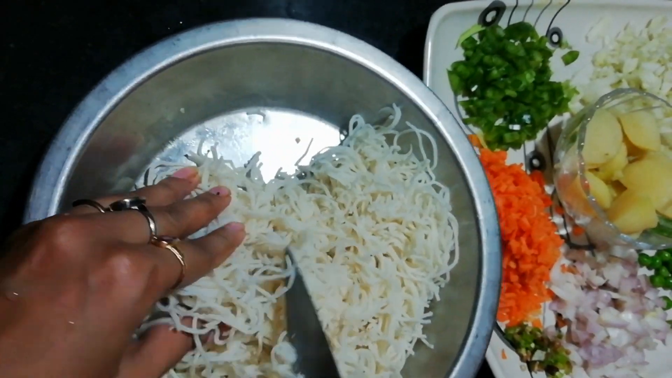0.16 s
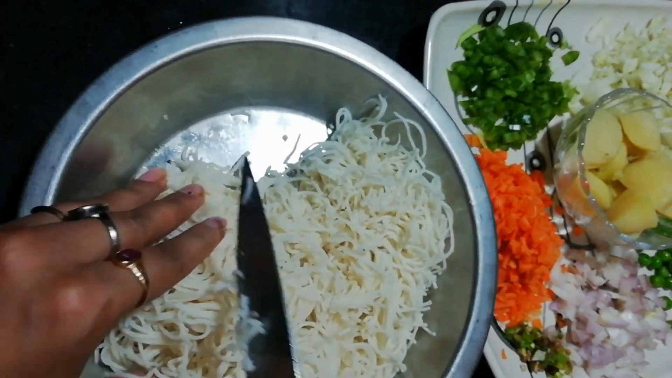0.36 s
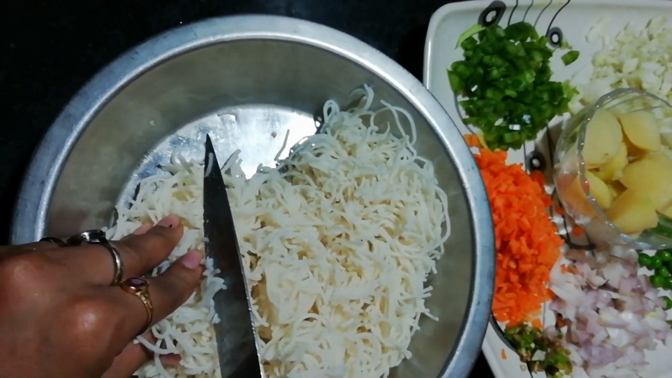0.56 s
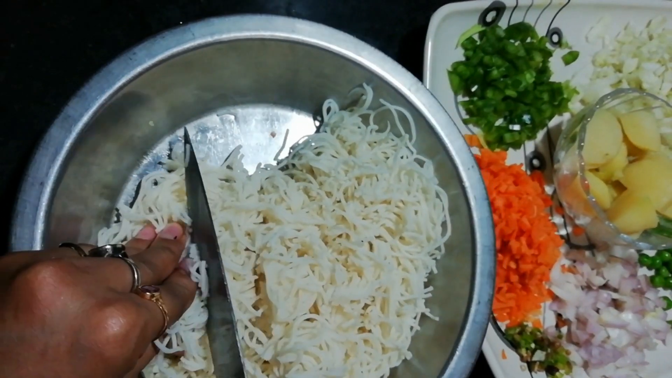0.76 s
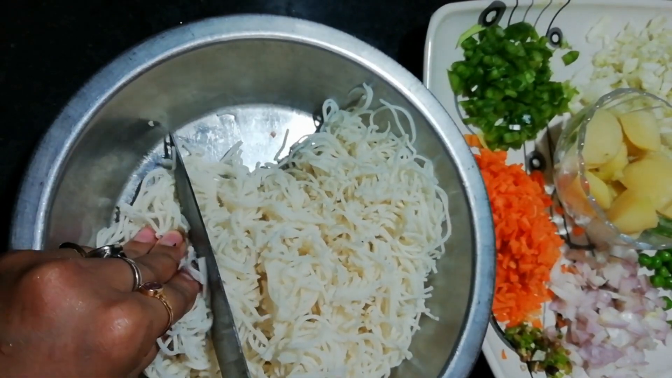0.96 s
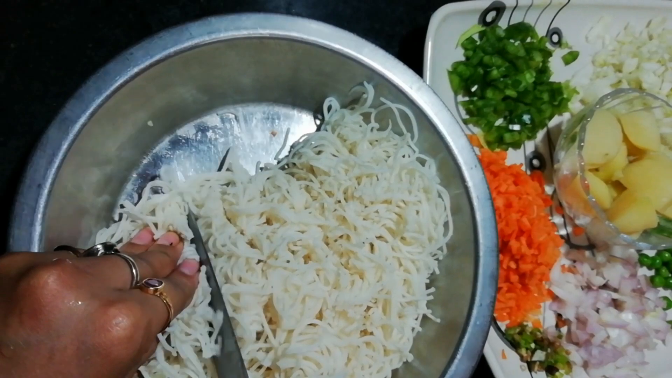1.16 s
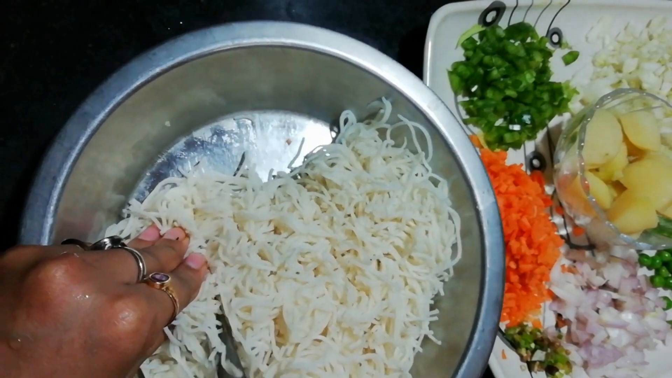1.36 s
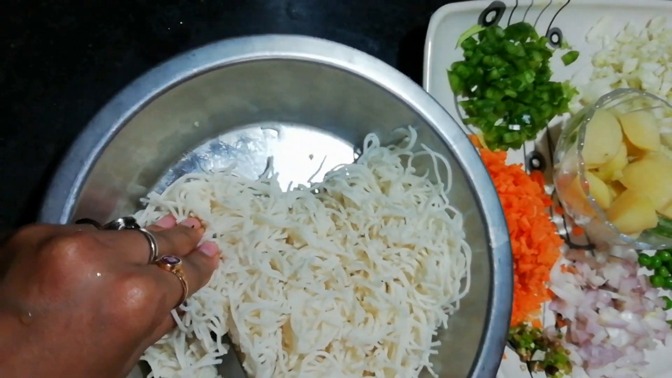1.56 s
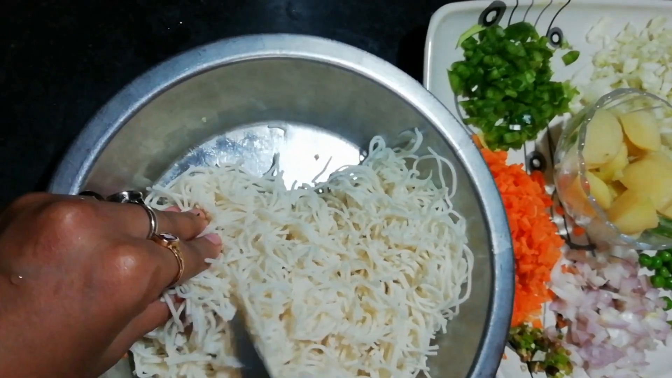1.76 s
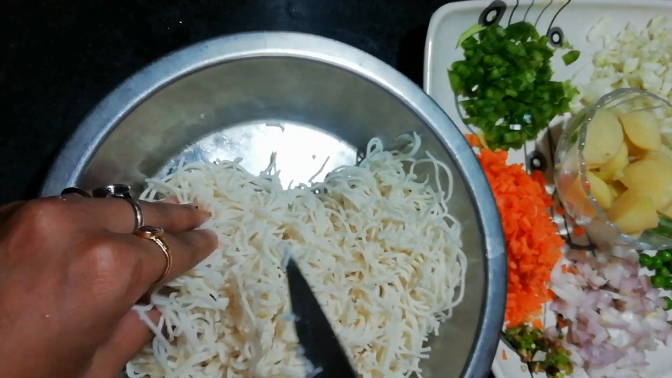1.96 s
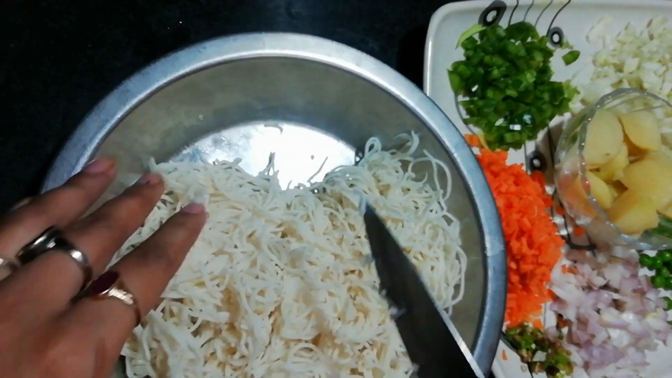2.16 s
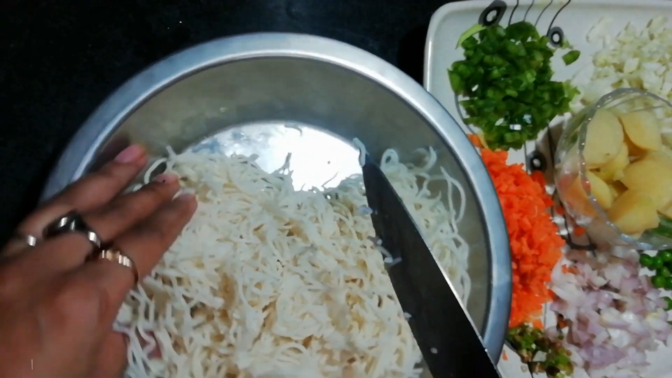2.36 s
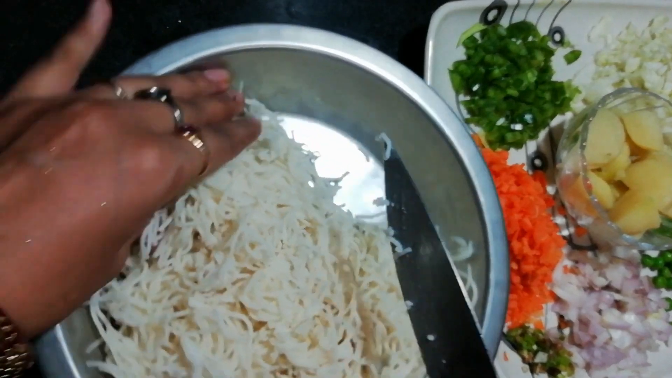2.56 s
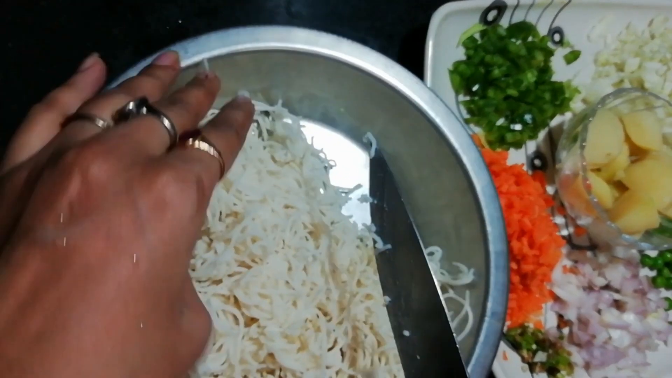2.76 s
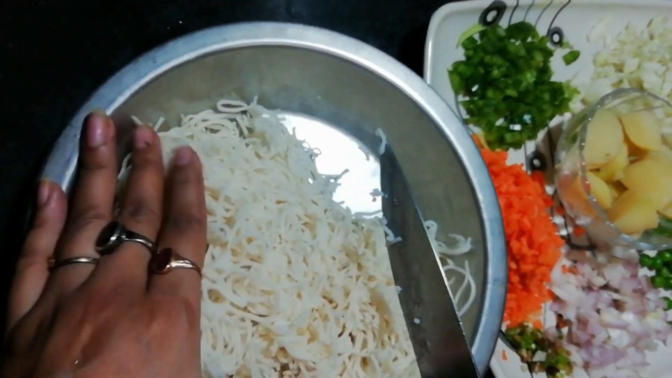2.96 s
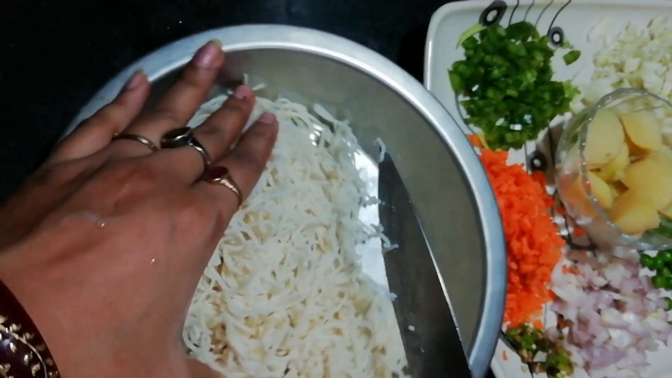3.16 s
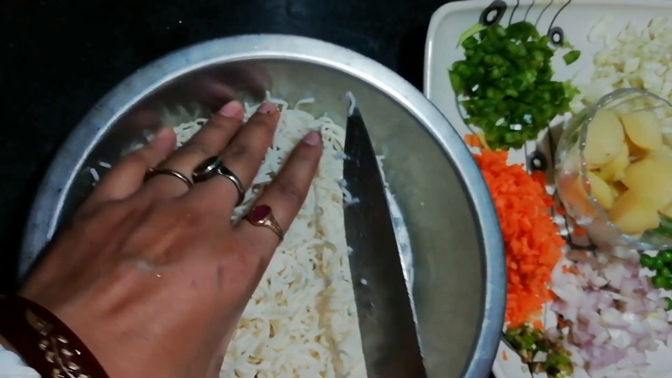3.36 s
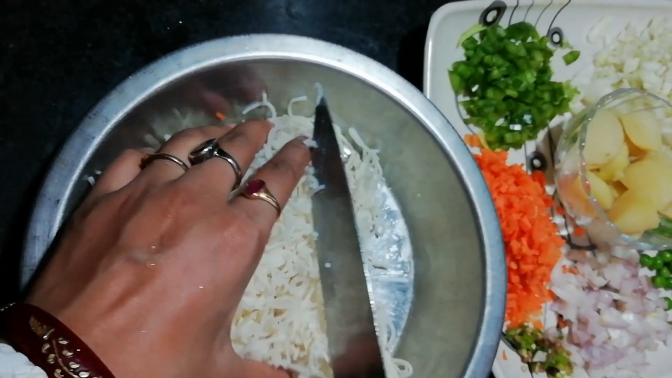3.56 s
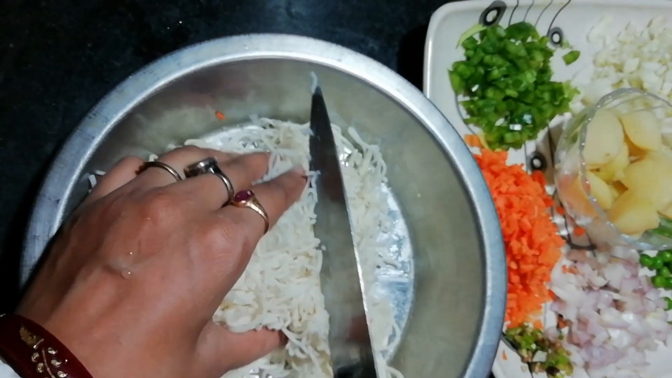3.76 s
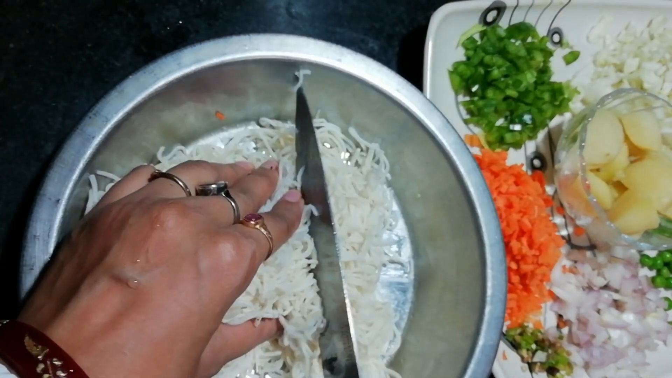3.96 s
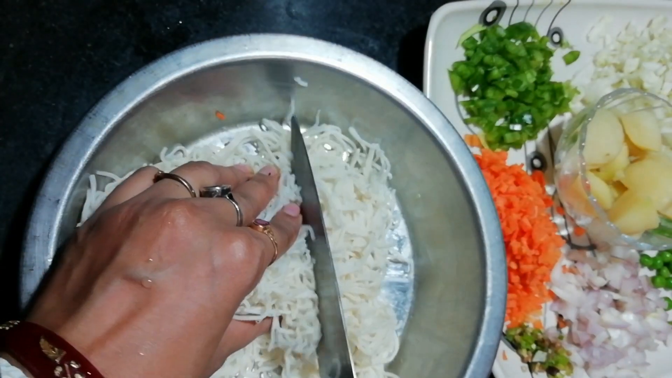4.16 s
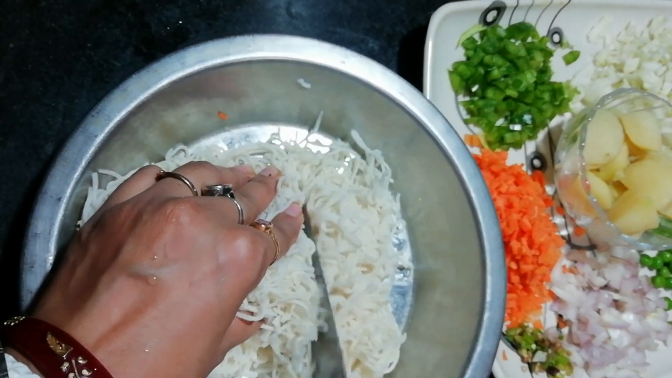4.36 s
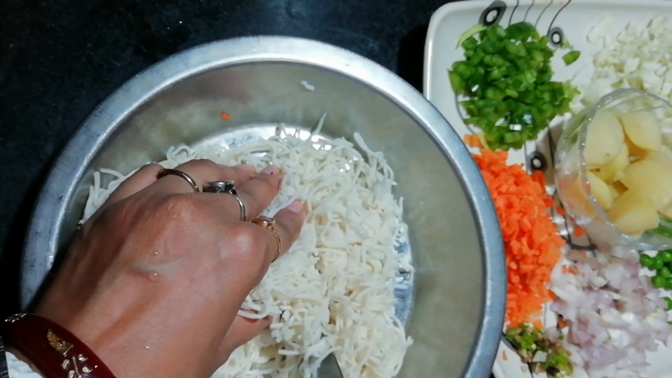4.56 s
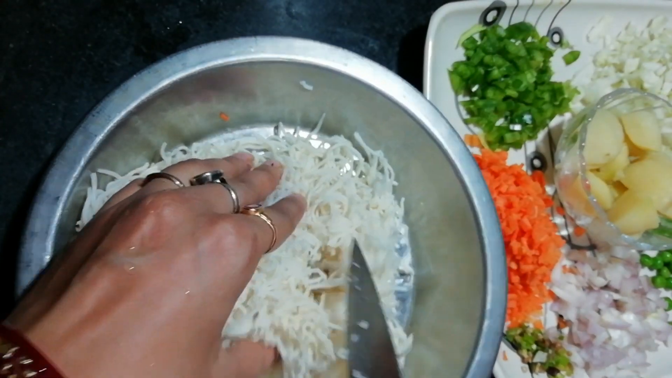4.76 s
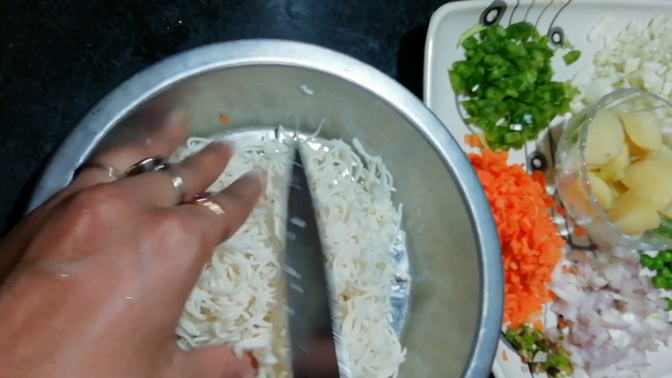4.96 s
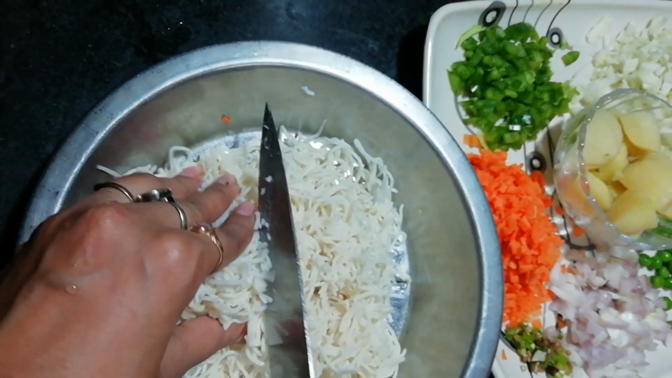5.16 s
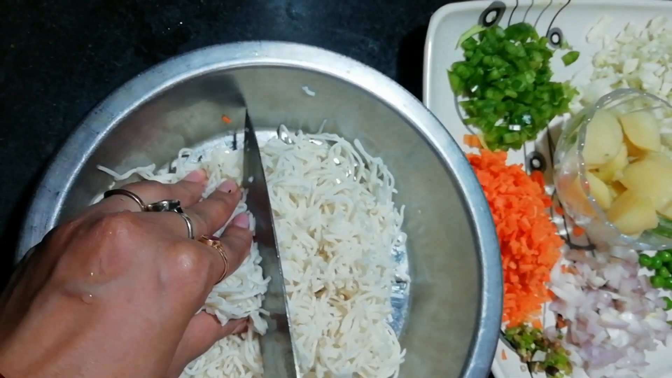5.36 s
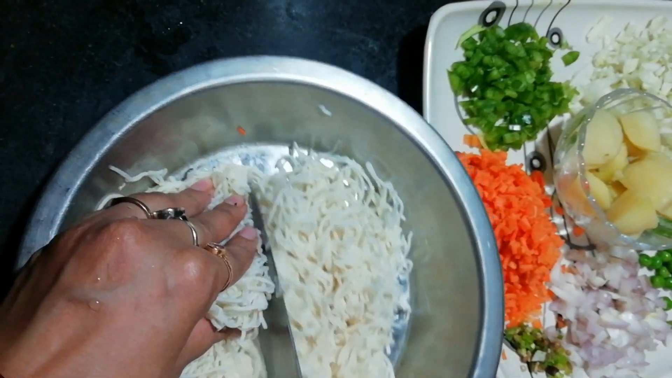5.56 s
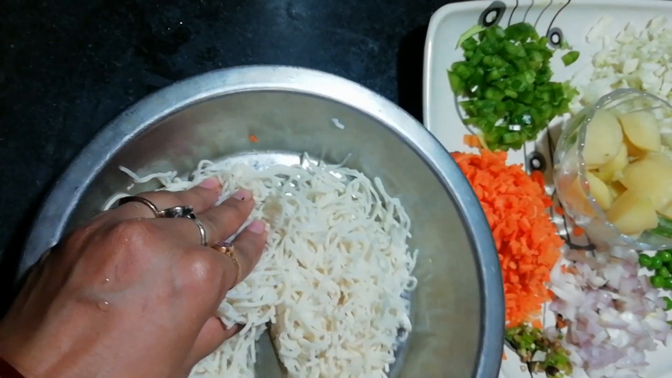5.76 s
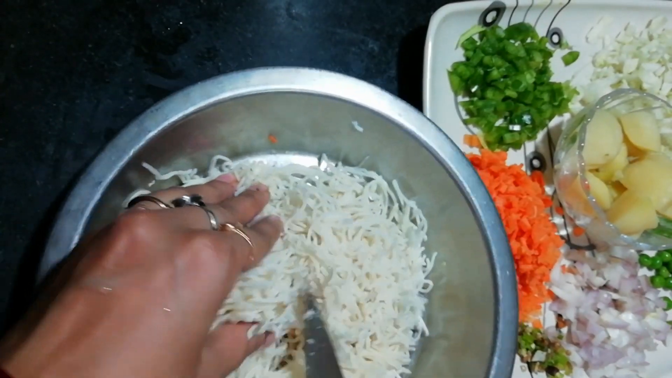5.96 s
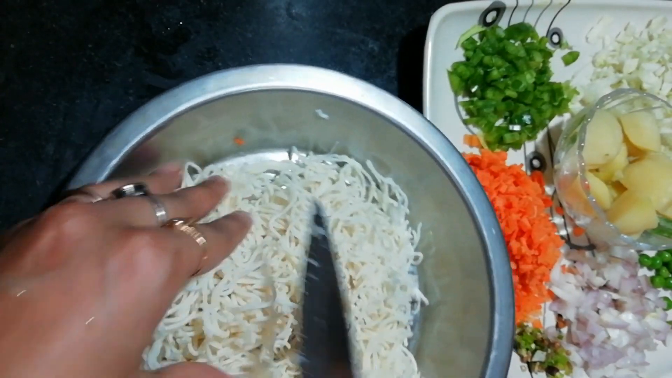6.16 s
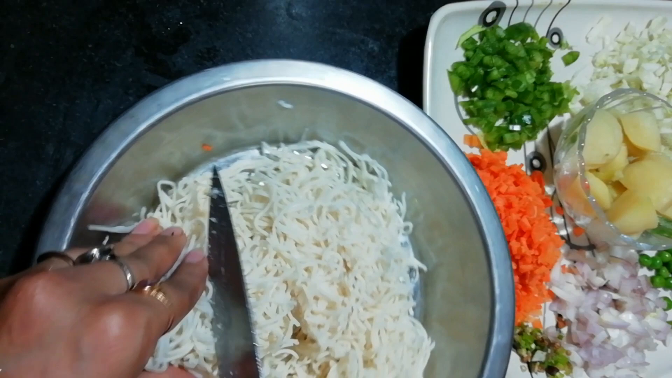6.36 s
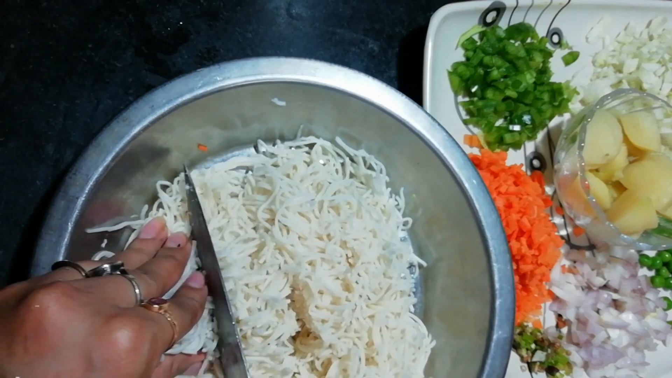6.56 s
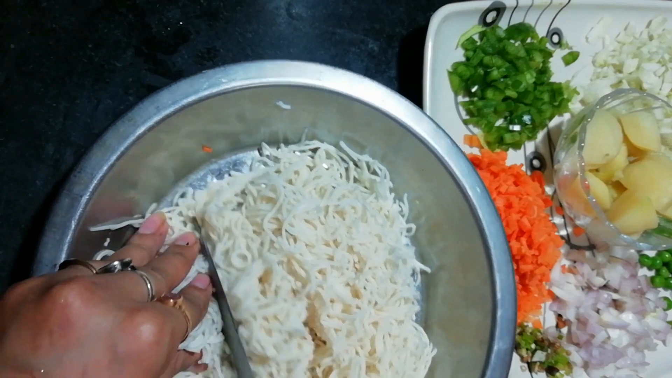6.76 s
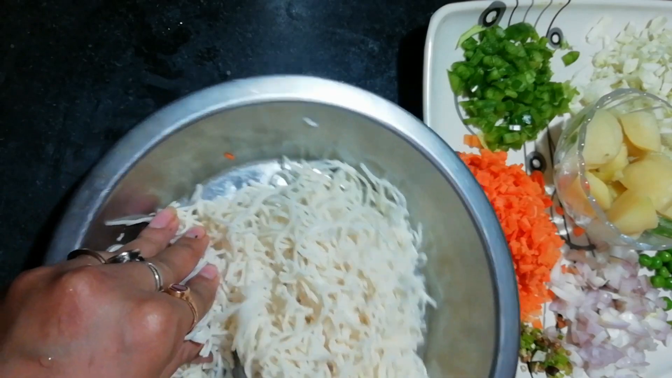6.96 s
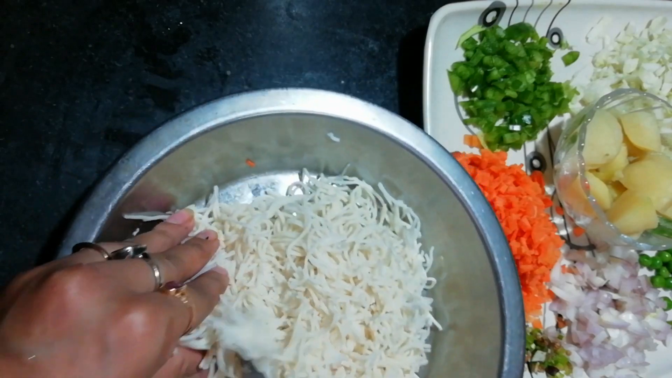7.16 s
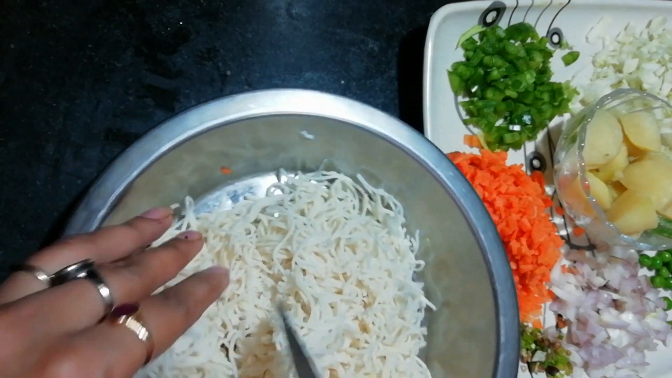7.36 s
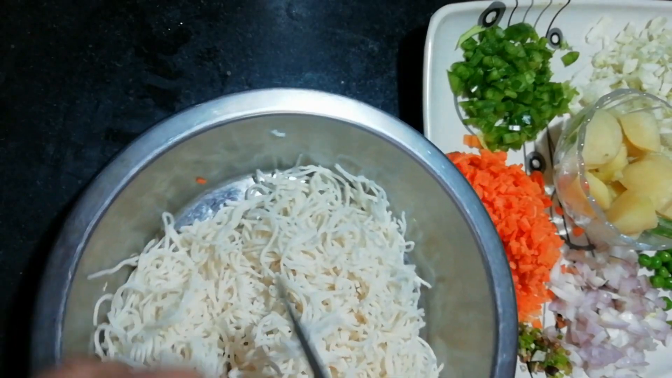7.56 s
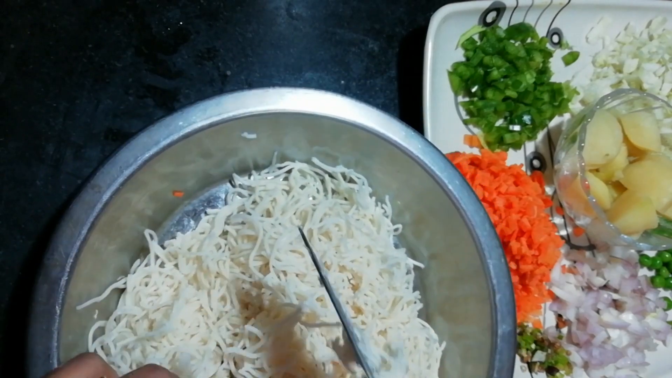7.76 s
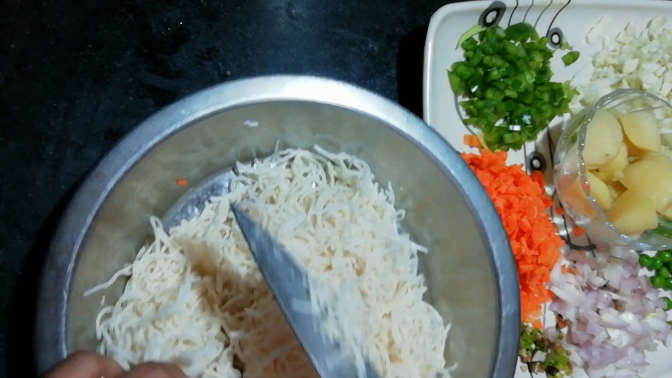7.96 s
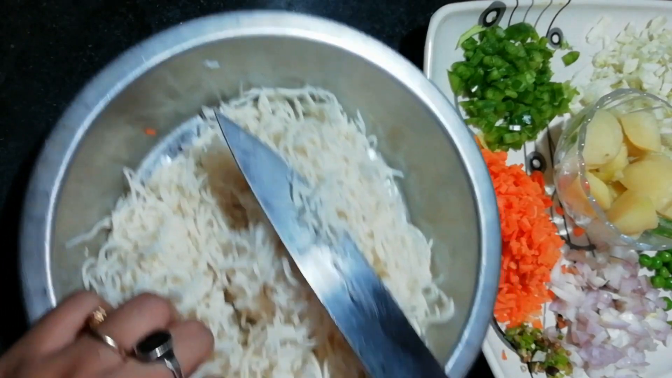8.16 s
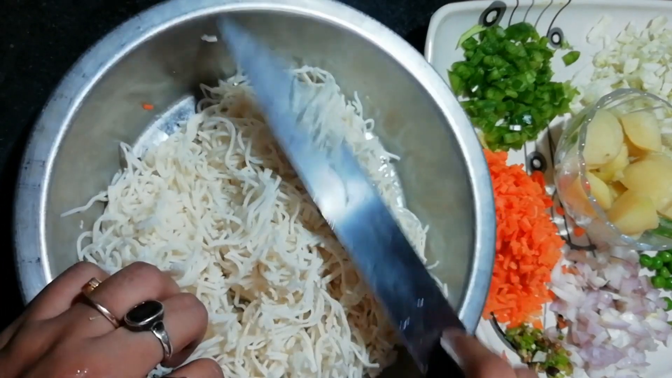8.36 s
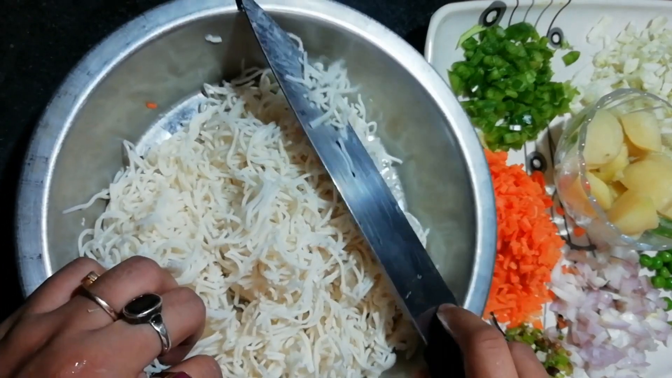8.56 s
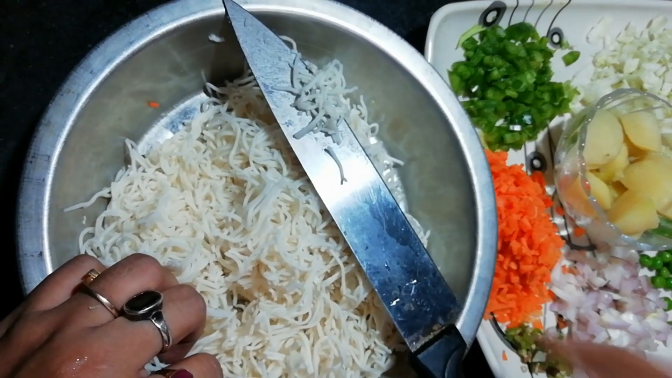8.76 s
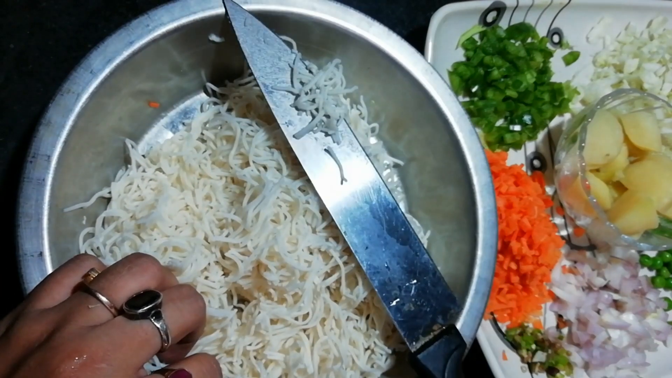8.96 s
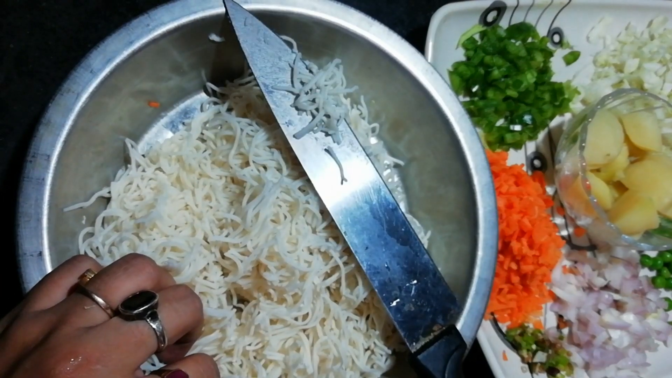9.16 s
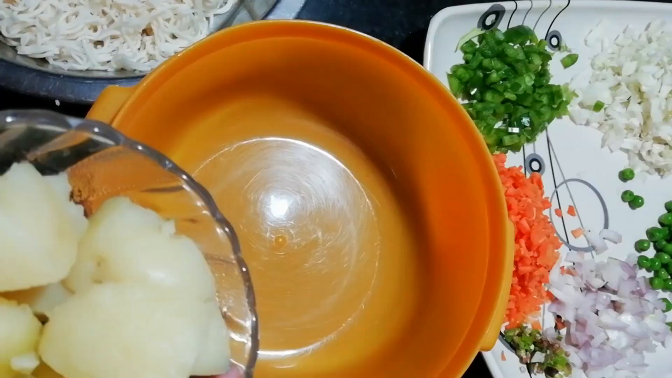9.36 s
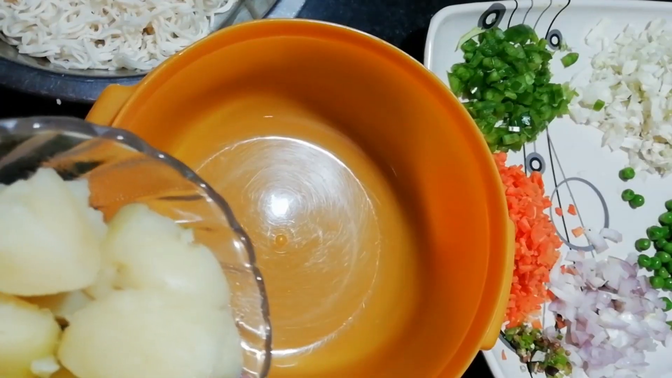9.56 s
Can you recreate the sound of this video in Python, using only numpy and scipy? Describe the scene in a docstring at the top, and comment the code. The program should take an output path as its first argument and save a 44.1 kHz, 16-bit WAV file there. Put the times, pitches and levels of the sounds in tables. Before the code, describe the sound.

Close, irregular metallic knocks and gritty blade drags through soft wet noodles in a metal bowl, with a small hard kitchen ringing briefly around them.

```python
"""A kitchen knife chops boiled noodles in a steel bowl, close to a phone in a small hard-walled kitchen.
The blade knocks excite decaying bowl modes, drags ring them with trains of slips, and the wet noodles
are filtered noise and clicks; at the end the blade is laid on the rim. Soft rubs and rumbles join in,
and the walls answer with a dense noise tail. Underneath lie a wavering low hum, a faint, thin whistle
of three partials and the coloured noise of the room's air."""
import sys
import numpy as np
from scipy import signal
from scipy.fft import rfft, irfft
from scipy.io import wavfile
from scipy.ndimage import uniform_filter1d

SR = 44100
rng = np.random.default_rng(int(sys.argv[2]) if len(sys.argv) > 2 else 0)


def materialize(psi):
    """Save the field psi as 16-bit PCM at rate SR to the path in sys.argv[1].

    A 1-D psi becomes a single channel; in a 2-D psi each row is a channel.
    """
    bounded = np.clip(np.atleast_2d(psi).T, -1, 1)
    quanta = np.round(bounded * 32767).astype(np.int16)
    wavfile.write(sys.argv[1], SR, quanta)


N = 423801
TIME = np.arange(N) / SR
PUSH_ATTACK_S, PUSH_RELEASE_S = 0.036, 0.041  # onset and release of pushes, rubs and shifts


def undb(db):
    """Decibels to gain."""
    return 10 ** (np.asarray(db) / 20)


def unit(x):
    """Scale to rms 1."""
    return x / np.sqrt(np.mean(x ** 2))


def fade(t, t60):
    """Exponential decay, 60 dB down after t60 seconds."""
    return np.exp(-np.log(1000) * t / t60)


def tint(x, points):
    """Causal minimum-phase filter that follows (Hz, dB) points, built from the cepstrum."""
    size = 8192
    hz, db = np.transpose(points)
    grid_hz = np.fft.rfftfreq(size, 1 / SR) + 1  # 1 Hz up, to keep the logarithm finite
    magnitude = undb(np.interp(np.log(grid_hz), np.log(hz), db))
    cepstrum = irfft(np.log(magnitude))
    # folding the cepstrum onto positive time makes the response causal
    cepstrum[1:size // 2] *= 2
    cepstrum[size // 2 + 1:] = 0
    response = irfft(np.exp(rfft(cepstrum)))[:size // 2]
    return signal.oaconvolve(np.atleast_2d(x), response[None], axes=-1)[:, :x.shape[-1]]


def band(x, lo_hz, hi_hz):
    """Butterworth band-pass."""
    edges_hz = [lo_hz, min(hi_hz, SR / 2 - 1000)]
    return signal.sosfilt(signal.butter(N=3, Wn=edges_hz, btype="band", fs=SR, output="sos"), x)


def registers(x):
    """Split into thud, body, zing and tick, from low to high."""
    edges_hz = (150, 1100, 3500, 9000, 16000)
    return [band(x, lo, hi) for lo, hi in zip(edges_hz, edges_hz[1:])]


def pair(size, alike):
    """Noise at the phone's two ports; alike is the shared part of its power."""
    shared = rng.standard_normal(size)
    separate = rng.standard_normal((2, size))
    return np.sqrt(alike) * shared + np.sqrt(1 - alike) * separate


def walk(rate):
    """Smoothed random wandering of rms 1, drawn anew about rate times a second."""
    hold = int(SR / rate)
    steps = np.repeat(rng.standard_normal(N // hold + 1), hold)
    return unit(uniform_filter1d(steps, hold)[:N])


def clicks(rate, spread_db):
    """Randomly timed slips of uneven size and either sign, about rate a second, at rms 1."""
    hits = rng.random(N) < rate / SR
    sizes = undb(spread_db * np.clip(rng.standard_normal(N), -2, 2))
    return unit(hits * rng.choice([-1, 1], N) * sizes)


def add(out, s, x):
    """Mix x in at time s."""
    start = max(int(s * SR), 0)
    out[:, start:start + x.shape[1]] += x[:, :N - start]


def stroke(start, length, db, change_db, attack_s, release_s):
    """Gain of one movement: it sets in, swells or eases steadily while it lasts, and lets go."""
    t, gain = TIME[:int((length + release_s) * SR)], np.zeros((1, N))
    gate = np.clip(t / attack_s, 0, 1) * np.clip(1 - (t - length) / release_s, 0, 1)
    level_db = db + change_db * np.minimum(t / length, 1)
    add(gain, start, (gate * undb(level_db))[None])
    return gain


def bowl(crowd_db, crowd_t60, scatter_db=4.0):
    """The steel's answer to one contact; each spot weights the modes differently."""
    # Modes of the loaded bowl and the blade.
    # Each row: frequency in Hz, level in dB, each before its random scatter, and t60 in s.
    modes = [(262, -17.5, 0.13), (361.5, -21, 0.31), (721, -8, 0.1), (801, -1.5, 0.083), (866, -3.5, .08),
             (1074, 2.5, 0.05), (1240, -21.5, 0.058), (1328, 2, 0.029), (1520, -7.5, 0.39),
             (1619, 2.5, 0.11), (1650, -13.5, 0.072), (2014, -3, 0.13), (2091, -2.5, 0.17),
             (2280, -17.5, .06), (2620, 4, 0.064), (2773, 7, 0.019), (3200, -7.5, 0.11), (4505, -13, 0.091),
             (5050, -10, 0.1), (5957, -5.5, 0.036), (5960, -7.5, 0.13), (6330, -2.5, 0.056),
             (6740, -14, 0.11), (8300, -16, .07), (9930, -10, 0.1), (12000, -12, .09), (13600, -22.5, .08),
             (15200, -13.5, .1)]
    # Colour of the crowd of short-lived modes between them. Each row: frequency in Hz, relative level in dB.
    crowd_colour = [(150, -26.5), (330, -15), (520, -17), (750, -7.5), (1150, -3), (1600, 6.5), (2700, -2),
                    (4100, -18.5), (5000, -12), (6200, -7.5), (8300, -21.5), (11000, -15), (15500, -13.5)]
    t = TIME[:int(SR * .2)]
    ring = 0
    for hz, db, t60 in modes:
        weight, detune, lag = rng.standard_normal(3)
        # the food shifts each mode a little
        mode_hz = hz * (1 + 0.0034 * detune)
        # each mode radiates its own way to the two ports: a lag in radians at the second
        phase = 2 * np.pi * mode_hz * t + np.array([[0], [lag]])
        ring = ring + rng.choice([-1, 1]) * undb(db + scatter_db * weight) * fade(t, t60) * np.sin(phase)
    crowd = tint(pair(len(t), alike=0.5) * fade(t, crowd_t60), crowd_colour)
    return unit(ring) + undb(crowd_db) * unit(crowd)


def knocks(trim_db=-7, free_t60=0.21):
    """Blows on the steel: cushioned ones thud, bare ones tick; one partial sings on after each."""
    # Blade meets bowl. Each row: start in seconds, level in dB before the trim, thud, zing and tick in dB
    # against that level, partial favoured by the contact point in Hz, its free ring in dB against the
    # strongest register.
    blows = [(0.096, -30.5, -6, -13, -23, 2176, -11), (0.2488, -43.5, -13, 2, -6, 1610, -5),
             (0.4665, -22.5, -0.5, -7.5, -8, 1440, -6), (0.957, -17, -11.5, -12, -21.5, 1612, -9),
             (1.2595, -14, -10, -17.5, -24, 1666, -12.5), (1.2909, -26, -25, -7, -28, 1570, -17),
             (1.4997, -23.5, -6, -11.5, -13, 1685, -10), (1.6521, -35, -7, -2, -24, 1970, -10),
             (2.0585, -37.5, 4.5, -8.5, -1.5, 1520, -7), (2.4189, -39.5, -9, 2, 0.5, 6490, -21.5),
             (2.5703, -20.5, -0.5, -4, -2.5, 1900, -11), (2.5849, -24, 1.5, -3, 8.5, 15300, 1),
             (2.6312, -42.5, -20, 16, 10, 4420, 0), (2.6377, -33, -16, 11, 16, 15400, -10),
             (2.774, -49, -18, 13, 20, 14000, -17), (2.9238, -57, -13, 16.5, 20.5, 10400, -14),
             (3.608, -44.5, 1.5, -1, -1.5, 1480, -10), (3.7211, -32, 0, 3.5, -6.5, 1940, 6.5),
             (4.0509, -32, -2.5, -0.5, 0, 5170, -7), (4.0948, -30, -2, -2.5, -10, 1334, -3),
             (4.1666, -24.5, -13, -22, -28, 1560, -20), (4.2041, -26, -25.5, -1, -21, 2660, -9),
             (4.4103, -16.5, -21, -15, -26, 2120, -3), (4.562, -21, -12, -7, -14, 2145, -9),
             (4.7436, -31.5, -7.5, -1, -9.5, 1110, -7), (5.1133, -43.5, 0, -1, -8, 3210, -1.5),
             (5.3993, -22.5, -4.5, -4, -5.5, 2140, -8), (5.4147, -15.5, -10.5, -11, -26, 2130, -17.5),
             (5.6819, -30, -6.5, 4.5, -3, 6070, -15), (5.772, -15, -25, -11, -14, 2910, -9),
             (5.7892, -16, -12, -13, -40, 2700, 0), (6.0022, -25, -9.5, 6.5, 2.5, 1225, -7),
             (6.6494, -12.5, -11.5, -9, -16, 1570, -29), (7.0258, -15.5, -10, -7, -11, 2950, -7.5),
             (8.432, -44.5, 0, -10.5, -14, 1050, -9), (8.572, -10.5, -11, 2, -4, 1954, -5),
             (8.6658, -12.5, -5, -4.5, -12, 1225, -3), (8.8169, -33, 1.5, -0.5, -16, 1543, -8),
             (8.9575, -61.5, -11, 25, 25.5, 3560, -27)]
    out, attack = np.zeros((2, N)), SR // 100  # levels are set over the first 10 ms
    for s, db, thud, zing, tick, hz, free_db in blows:
        levels = db + trim_db + np.array([thud, 0, zing, tick])
        parts = registers(bowl(crowd_db=3.5, crowd_t60=0.029))
        blow = sum(undb(level) * part / part[:, :attack].std() for level, part in zip(levels, parts))
        t = TIME[:blow.shape[1]]
        free = undb(levels.max() + free_db) * fade(t, free_t60) * np.sin(2 * np.pi * hz * t)
        add(out, s, blow + free)
    return out


def drags(thud_db=-9.5, body_db=-2, zing_db=-3, lowest_hz=480, attack_s=0.0027, release_s=0.011):
    """The edge sticks and slips on the bottom; every slip rings the bowl, but too lightly for its lowest modes."""
    # The edge dragged along the bottom. Each row: start in seconds, length in seconds, level in dB before
    # the register trims, change of level over the stroke in dB, further zing gain in dB.
    strokes = [(0.0, 0.11, -35.5, -18, -3.5), (1.338, 0.15, -50.5, 7.5, -9), (1.522, 0.16, -49.5, -1.5, -6),
               (4.159, 0.054, -36, -6, -3), (4.41, 0.12, -28, 3.5, -9.5), (4.519, 0.2, -32.5, -13.5, -5),
               (5.742, 0.047, -21.5, -3, -5.5), (5.798, 0.14, -38.5, -2, -5),
               (6.746, 0.061, -40, 10.5, -8.5), (6.803, 0.11, -28, -2, -14), (6.91, 0.065, -49, -8, -12)]
    scrape = clicks(rate=490, spread_db=4.5) + undb(-2) * unit(rng.standard_normal(N))
    slips = band(scrape, lowest_hz, 17000)
    steel = bowl(crowd_db=2.0, crowd_t60=0.021)
    ringing = signal.oaconvolve(slips[None], steel, axes=-1)[:, :N]
    thud, body, zing, _ = map(unit, registers(ringing))
    gains = [stroke(*move, attack_s, release_s) for *move, _ in strokes]
    bite = sum(gain * undb(row[-1]) for gain, row in zip(gains, strokes))
    return sum(gains) * (undb(thud_db) * thud + undb(body_db) * body) + bite * undb(zing_db) * zing


def noodles(hiss_db=1, squelch_db=-4):
    """Wet strands rub along the blade with a fine hiss, and tiny films of water snap between them."""
    # Noodles pushed over the steel. Each row: start in seconds, length in seconds, level in dB before the
    # hiss and squelch trims, change of level over the push in dB, further squelch gain in dB.
    pushes = [(0.0, 0.082, -42, -8.5, 6.5), (0.194, 0.097, -62, 3.5, 0), (1.258, 0.32, -52.5, 7.5, 2),
              (1.578, 0.13, -55, 5.5, 0), (1.848, 0.068, -58.5, 11, -3), (2.391, 0.14, -49, 5.5, -10.5),
              (2.556, 0.039, -39.5, 0, -5), (2.648, 0.069, -43, -8, 1), (3.067, 0.16, -44.5, 2.5, -8),
              (3.246, 0.21, -50.5, -17.5, -4), (3.461, 0.061, -58, -0.5, 1), (4.156, 0.13, -38.5, -12, 0),
              (4.4, 0.22, -46.5, 3.5, 0), (4.705, 0.21, -66, 10.5, 2), (5.536, 0.18, -48.5, 1.5, -3.5),
              (5.73, 0.09, -37, -3.5, -13), (5.863, 0.12, -45.5, 1, 0.5), (6.322, 0.16, -63, 6.5, -8),
              (6.766, 0.23, -46, -3.5, -4), (7.017, 0.1, -44, 0, 4), (7.7, 0.11, -59, -2, -8),
              (7.971, 0.14, -53, 11, -7), (8.105, 0.2, -44.5, 3.5, -10), (8.322, 0.09, -49, -7.5, -10)]
    # Colour of the slide, before band-passing. Each row: frequency in Hz, relative level in dB.
    slide_colour = [(290, -58.5), (500, -24), (657, -31.5), (927, -11.5), (1220, -10.5), (2360, -13.5),
                    (3100, -6), (4250, -11.5), (6270, -2), (8360, -11.5), (12100, -8.5), (14600, -4),
                    (15500, -4.5)]
    rub = pair(N, alike=0.13) + undb(-7.5) * clicks(rate=890, spread_db=10.0)
    hiss = undb(hiss_db + 1.8 * walk(35)) * unit(band(tint(rub, slide_colour), 3600, 17000))
    films = pair(N, alike=0.28) + clicks(rate=150, spread_db=12.0)
    squelch = unit(band(tint(films, slide_colour), 750, 3000))
    gains = [stroke(*move, PUSH_ATTACK_S, PUSH_RELEASE_S) for *move, _ in pushes]
    wetness = sum(gain * undb(row[-1]) for gain, row in zip(gains, pushes))
    return sum(gains) * hiss + wetness * undb(squelch_db) * squelch


def rubs():
    """A soft, dull, grainy rub: noise and random slips with the treble muffled."""
    # Each row: start in seconds, length in seconds, level in dB, change of level over the rub in dB.
    moves = [(1.912, 0.13, -55.5, 4.5)]
    # Colour of the rub. Each row: frequency in Hz, relative level in dB.
    rub_colour = [(200, -25), (380, -2), (600, -5), (900, 0), (1700, -7), (2500, -25), (8000, -50)]
    grain = unit(tint(pair(N, alike=0.5) + clicks(rate=300, spread_db=5), rub_colour))
    return grain * sum(stroke(*move, PUSH_ATTACK_S, PUSH_RELEASE_S) for move in moves)


def shifts():
    """Low rumbles as the bowl shifts on the counter: a narrow band of noise, nearly alike at both ports."""
    # Each row: start in seconds, length in seconds, level in dB, change of level over the shift in dB.
    moves = [(2.56, 0.085, -58, -5), (5.99, 0.15, -46.5, -7), (8.223, 0.27, -55.5, 1.5)]
    rumble = unit(band(pair(N, alike=0.9), 139, 214))
    return rumble * sum(stroke(*move, PUSH_ATTACK_S, PUSH_RELEASE_S) for move in moves)


def kitchen(x, wet_db=-3, build_s=0.0023):
    """Hard walls return a dense tail that builds up quickly and loses its top treble first."""
    t = TIME[:int(SR * .7)]
    parts = registers(pair(len(t), alike=0.13))
    t60s = (0.36, 0.38, 0.37, 0.25)  # s, for thud, body, zing and tick
    tail = sum(part * fade(t, t60) for part, t60 in zip(parts, t60s))
    tail = tail * (1 - np.exp(-(t / build_s) ** 2))
    echo = signal.oaconvolve(x, unit(tail) / np.sqrt(len(t)), axes=-1)[:, :N]
    return x + undb(wet_db) * echo


def ports(x):
    """The bowl faces the two ports differently: the right one is shaded from its top treble."""
    # The left port against the right. Each row: frequency in Hz, level difference in dB.
    difference = [(100, 5.5), (450, -1), (780, 8), (1200, 0.5), (2600, 3), (4500, 1), (6200, -4.5),
                  (8500, -1), (10000, 9), (11500, 16), (15000, 17.5)]
    hz, db = np.transpose(difference)
    mean_db = 10 * np.log10((1 + undb(db) ** 2) / 2)  # keeps the mean power of the two ports
    left, right = x
    return np.vstack([tint(left, np.c_[hz, db - mean_db]), tint(right, np.c_[hz, -mean_db])])


def whistle(trim_db=-4.0, waver=0.008, grain_db=2.5, ramp_s=0.035):
    """A faint tone with two weak companions; each note holds its pitch, with a quick flutter and a broken level."""
    # A thin, grainy whistle. Each row: start in seconds, length in seconds, level in dB before the trim and
    # grain, change of level over the note in dB, pitch in Hz about which it flutters.
    notes = [(2.17, 0.335, -56.5, 7, 3115), (4.75, 0.31, -52.5, -2.5, 3190), (5.063, 0.3, -60, 2, 3190),
             (6.15, 0.24, -63.5, -3, 3200)]
    # Each row: ratio to the pitch, relative level in dB.
    partials = [(0.756, -19.5), (1, -2.5), (1.12, -15)]
    starts, *_, hz = np.transpose(notes)
    pitch = hz[np.searchsorted(starts[1:], TIME)] * (1 + waver * walk(400))
    phase = 2 * np.pi * np.cumsum(pitch) / SR
    tone = unit(sum(undb(part_db) * np.sin(ratio * phase) for ratio, part_db in partials))
    gain = sum(stroke(*note, ramp_s, ramp_s) for *note, _ in notes)
    return tone * undb(trim_db + grain_db * walk(90)) * gain


def low_hum(centre_hz=92.1, width_hz=9.26, trim_db=-1):
    """A low sine whose pitch and level waver at random, the same at both ports."""
    # Level of the hum over time. Each row: time in seconds, level in dB before the trim.
    levels = [(0.05, -53), (0.12, -62), (1.24, -62), (1.37, -42.5), (1.97, -55.5), (3.6, -54), (3.7, -42.5),
              (4.06, -72), (4.17, -43.5), (4.35, -56.5), (5.15, -42.5), (5.67, -58.5), (6.42, -38.5),
              (6.68, -50.5), (8.23, -48.5), (8.93, -59.5), (9.14, -42.5), (9.35, -59.5)]
    s, db = np.transpose(levels)
    pitch = centre_hz + .5 * width_hz * walk(30)
    hum = unit(np.sin(2 * np.pi * np.cumsum(pitch) / SR) * undb(2.5 * walk(18)))
    return hum * undb(np.interp(TIME, s, db) + trim_db)


def room_air(level_db=-59.5, side_db=-1):
    """Coloured noise of the room's air, drifting slowly in level; its bass is the same at both ports."""
    # Colour of the air. Each row: frequency in Hz, relative level in dB.
    air_colour = [(13, -19.5), (22, -10), (53, -23.5), (74, -19.5), (97, -5), (111, -7), (124, -13),
                  (187, -14), (382, -30.5), (438, -32), (779, -34), (2330, -39.5), (3240, -41.5),
                  (4510, -43.5), (15500, -52)]
    # opposite signs at the two ports spread the air above the bass
    side = undb(side_db) * band(rng.standard_normal(N), 350, 17000) * np.array([[1], [-1]])
    air = tint(rng.standard_normal(N) + side, air_colour)
    air = air / band(air.mean(axis=0), 200, 15000).std()  # the level counts 200 Hz to 15 kHz
    return air * undb(level_db + 1.2 * walk(2.7))


def scene():
    """Bowl, blade and noodles close by between hard walls, over the whistle, the hum and the air."""
    near = ports(kitchen(knocks() + drags() + noodles() + rubs() + shifts()))
    return near + whistle() + low_hum() + room_air()


def record(dry):
    """The phone rounds the highest peaks, cuts the top and falls silent at the end."""
    end_s, top_hz = 9.385, 15400
    sound = np.tanh(dry) * np.clip((end_s - TIME) * 200, 0, 1)  # fades out over the last 5 ms
    return signal.sosfilt(signal.ellip(8, .2, 70, top_hz, fs=SR, output="sos"), sound)


dry = scene()
out = record(dry)
materialize(out)
```